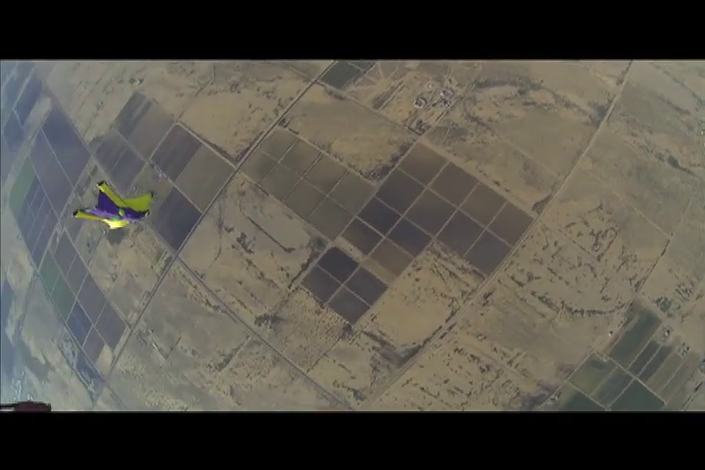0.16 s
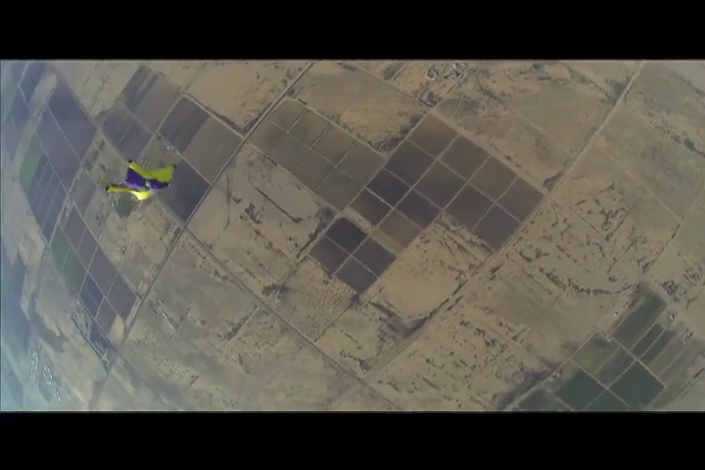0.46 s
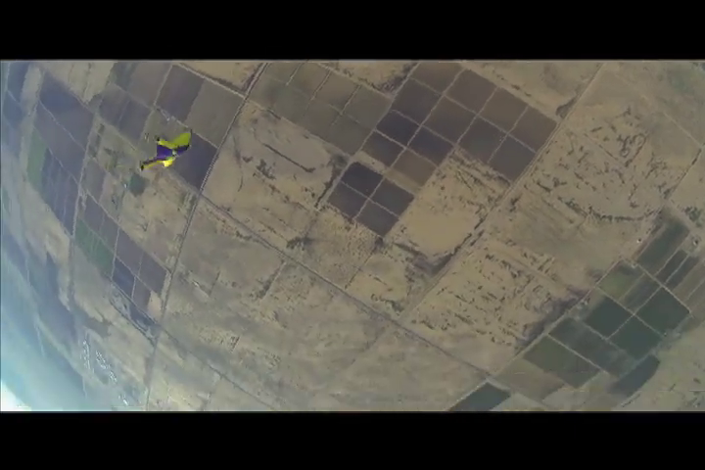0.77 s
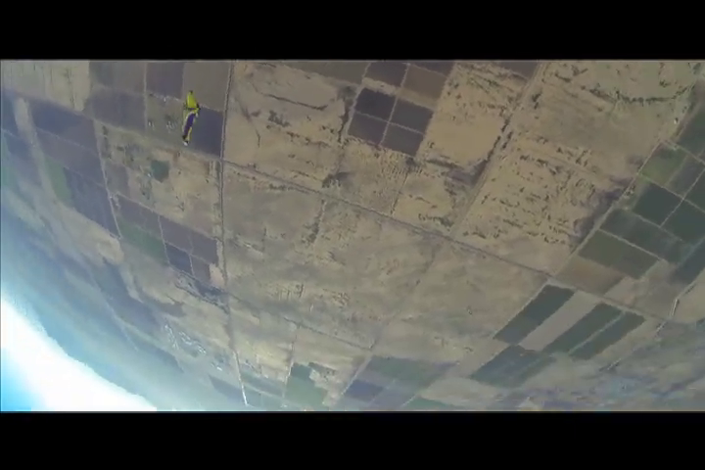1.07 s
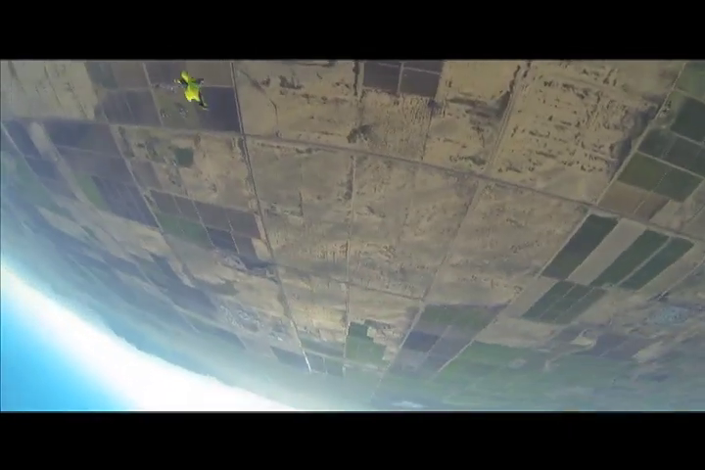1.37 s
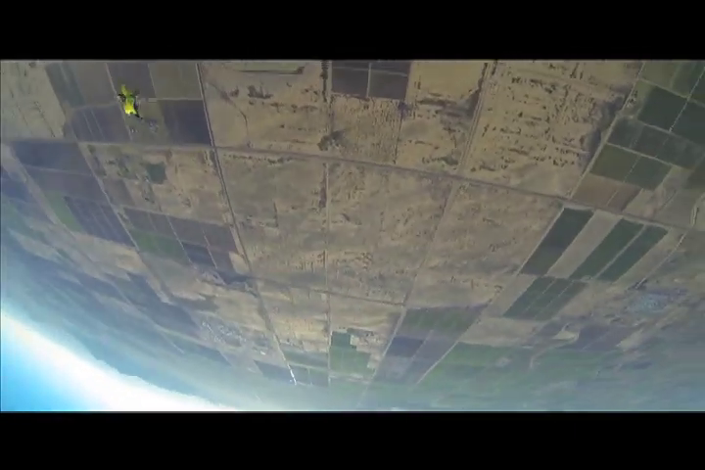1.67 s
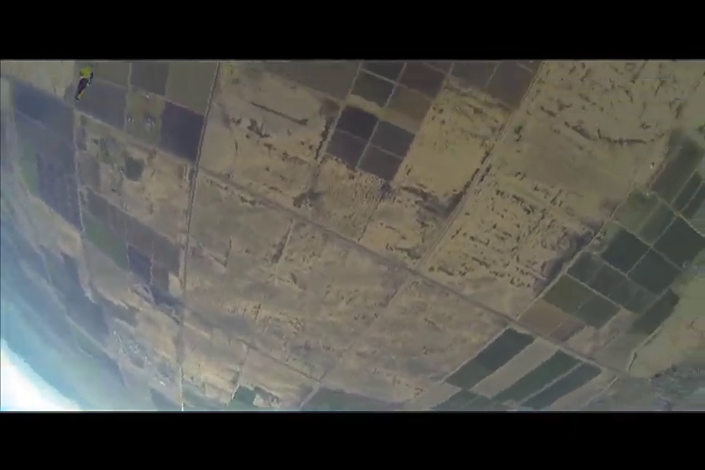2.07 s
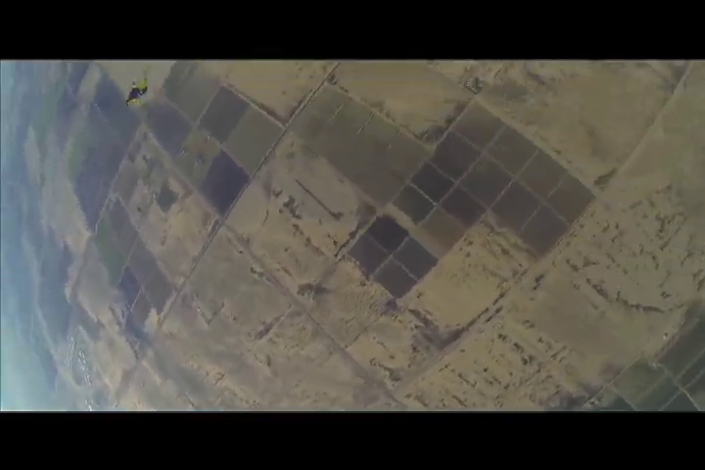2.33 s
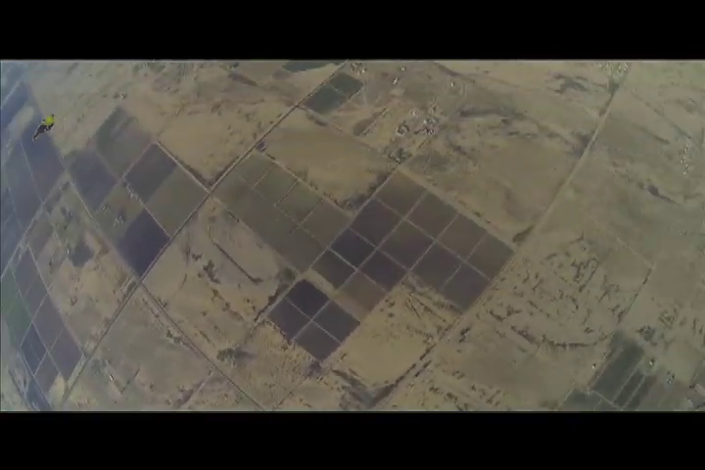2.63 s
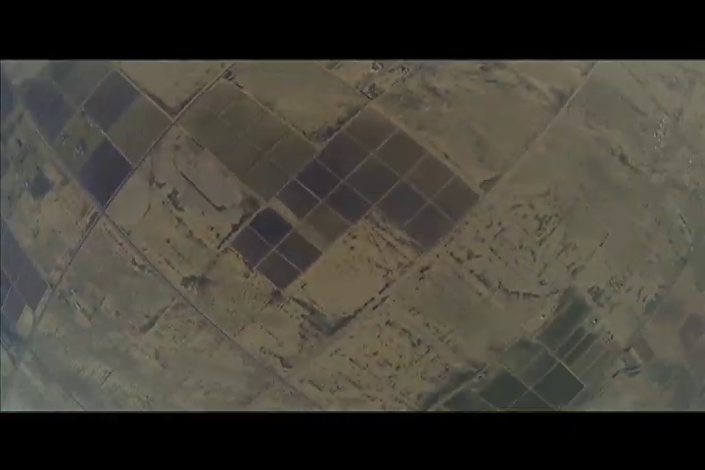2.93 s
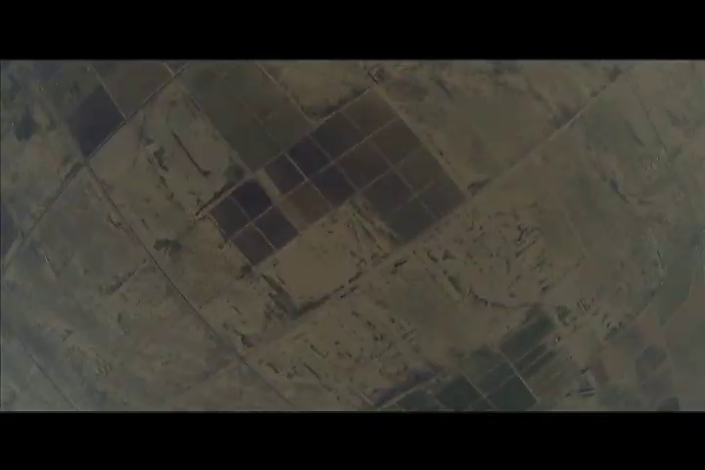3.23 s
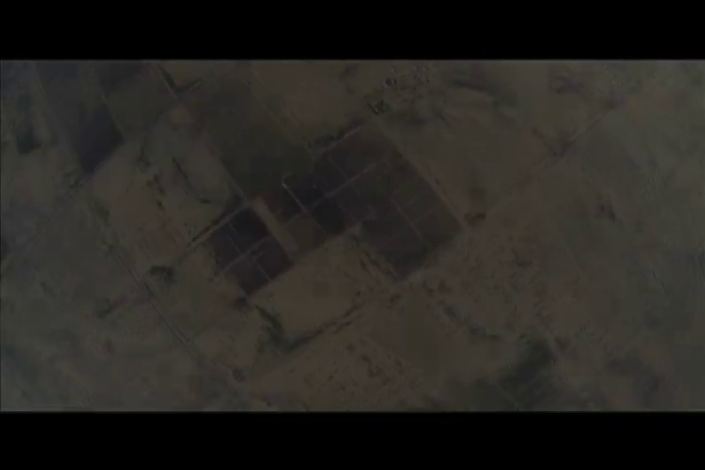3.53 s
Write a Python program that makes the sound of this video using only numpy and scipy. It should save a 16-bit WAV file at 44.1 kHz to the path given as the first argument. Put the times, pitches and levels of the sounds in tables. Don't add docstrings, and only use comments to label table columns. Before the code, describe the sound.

Violent freefall wind blasts a small camera microphone from the start, left channel only, the right silent. Harsh, hollow hiss and mid roar ride over lumpy bass rumble, fullest before 0.75 s. Irregular buffets thump and overload the input until about 2.6 s, strongest near 0.2 and 0.8, each briefly ducking the hiss. Fuzzy whistles pass near 0.7 and 2.1-2.4; rumble thins and wind fades by 3.7 s.

```python
import sys
import numpy as np
from scipy import signal
from scipy.fft import rfft, irfft
from scipy.io import wavfile
from scipy.ndimage import uniform_filter1d

SR = 44100
rng = np.random.default_rng(int(sys.argv[2]) if len(sys.argv) > 2 else 0)


def volts_from_decibels(level):
    exponent = np.asarray(level, float) / 20
    return 10 ** exponent


def file_out(sig):
    cols = np.atleast_2d(sig).T
    lim = np.clip(cols, -1, 1)
    pcm = np.round(lim * 32767).astype(np.int16)
    wavfile.write(sys.argv[1], SR, pcm)


N = 163170
TIME_S = np.arange(N) / SR
SPECTRUM_HZ = np.fft.rfftfreq(N, 1 / SR)

# time_s [s], hiss_db [dB], buffeting_db [dB], brightness_db [dB]
AIRFLOW = [(0, -16.5, -9.5, -5), (.04, -15, -11, -2.5), (.12, -10.5, -12, 0), (.25, -12, -11, -2),
           (.55, -12, -14, -2), (.74, -11.5, -13, 2.5), (.85, -15, -15.5, 1), (.94, -14, -15, 3),
           (1.05, -13, -13, -1), (1.19, -12.5, -13, 1), (1.3, -15, -14.5, -1), (1.48, -13.5, -12, 1),
           (2.03, -13.5, -15, 2.5), (2.2, -14.5, -17, 4), (2.45, -14.5, -20, 2), (2.66, -15, -19, -2),
           (3.08, -16, -25.5, 0.5), (3.7, -19, -25.5, 1.5)]
# time_s [s], gain_drop_db [dB], thump_db [dB], pitch_hz [Hz]
BIG_BUFFETS = [(0.038, 3.5, -6, 60), (0.173, 2, 5.5, 61.4), (.40, 2.5, -2.5, 70), (0.606, 3.5, 0, 60),
               (0.802, 3.5, 6, 50.5), (0.966, 3, 1.5, 59.7), (1.207, 4.5, -16, 70.4), (1.287, 4.5, -2, 70),
               (1.51, 4.5, -2, 59.7), (1.601, 3.5, -1, 60), (1.719, 3, 1.5, 60), (2.094, 4, 1.5, 68.6),
               (2.238, 3.5, -2, 70), (2.351, 3, -11, 70), (2.50, 2.5, -1, 70), (2.599, 3, -8, 70)]


def evened(x):
    return x / np.sqrt(np.mean(x ** 2) + 1e-20)


def read(points, hz):
    f, value = np.transpose(points)
    return np.interp(np.log(hz + 1), np.log(f + 1), value)


def filtered(x, gain):
    return irfft(rfft(x) * gain, N)


def wander(t, low_hz, high_hz):
    total = np.zeros(len(t))
    for f in np.geomspace(low_hz, high_hz, num=24):
        total += np.sin(2 * np.pi * (f * t + rng.random())) / np.sqrt(f)
    return evened(total)


def resonate(x, hz, width_hz):
    turn = np.exp(2j * np.pi * np.cumsum(hz * np.ones(len(x))) / SR)
    r = np.exp(-np.pi * width_hz / SR)
    return 2 * (turn * signal.lfilter([1 - r], [1, -r], x / turn)).real


def knocked_db(t):
    drop_s, recover_db_per_s = 0.0042, 38.5
    gain_db = np.zeros(len(t))
    for start_s, drop_db, _, _ in BIG_BUFFETS:
        onset = np.clip((t - start_s) / drop_s, 0, 1)
        gain_db -= onset * np.maximum(drop_db - recover_db_per_s * (t - start_s), 0)
    return gain_db


def whistles():
    # start_s [s], length_s [s], level_db [dB], pitch_hz [Hz], glide [share of pitch]
    port_notes = [
        (.63, .16, -17.5, 2800, .2),
        (2.12, 0.13, -16.5, 2850, -.03),
        (2.24, .13, -14, 2760, -.02),
        (2.374, .11, -23, 825, 0),
        (0, .3, -18, 1120, .05),
    ]
    out, air = np.zeros(N), rng.standard_normal(N)
    for start_s, length_s, level_db, pitch_hz, glide in port_notes:
        progress = np.clip((TIME_S - start_s) / length_s, 0, 1)
        gliding_hz = pitch_hz * (1 + glide * (progress - .5))
        width_hz = 600 * pitch_hz / 2800
        note = resonate(resonate(air, gliding_hz, width_hz), gliding_hz, width_hz)
        out += volts_from_decibels(level_db) * np.sin(np.pi * progress) * evened(note)
    return out


def roar():
    # frequency_hz [Hz], density_db [dB per Hz]
    turbulence = [(250, -23), (400, -4), (700, 1), (1000, 1.5), (1300, -2), (1800, -32.5)]
    base_db, follows, opening_db = -25, .8, 4
    time_s, _, buffeting_db, _ = np.transpose(AIRFLOW)
    noise = evened(filtered(rng.standard_normal(N), volts_from_decibels(read(turbulence, SPECTRUM_HZ))))
    opening = opening_db * np.clip((.75 - TIME_S) / .05, 0, 1)
    swell = follows * (np.interp(TIME_S, time_s, buffeting_db) - buffeting_db.mean())
    return noise * volts_from_decibels(base_db + opening + swell + 1.6 * wander(TIME_S, 2.49, 30))


def hiss():
    # frequency_hz [Hz], density_db [dB per Hz]
    shear = [(300, -13), (550, -12), (1000, -1.5), (2200, -1.5), (3500, -7.5), (6000, -15.5),
             (11500, -24.5), (15500, -44)]
    # pitch_hz [Hz], width_hz [Hz], boost_db [dB]
    resonances = [(695, 140, 8.5), (1342, 206, 13.5), (1509, 645, 15.5), (2800, 640, 7), (3320, 310, 7.5),
                  (4130, 180, 4.5), (5037, 910, 8), (6420, 230, 9), (7310, 590, 5.5), (8100, 400, 3.5),
                  (10900, 1000, -1), (13400, 1200, 8.5)]
    patchy_db, gust_db, trim_db = 0.75, 0.46, 6
    cavity_follows, treble_follows = 0.91, 1.07
    time_s, level_db, _, bright_db = np.transpose(AIRFLOW)

    frames, hz = N // 128 + 5, np.fft.rfftfreq(512, 1 / SR)
    t = np.arange(frames) * 128 / SR
    real, imaginary, patches = rng.standard_normal((frames, 257, 3)).T
    patches = uniform_filter1d(patches, size=10, axis=0)
    patches = evened(uniform_filter1d(patches, size=20, axis=1))
    follows = read([(1800, cavity_follows), (4000, treble_follows)], hz)[:, None]
    tilt = read([(1700, 0), (2600, 0.68), (12000, 0.83)], hz)[:, None]
    bright = tilt * np.interp(t, time_s, bright_db)
    motion = knocked_db(t) + gust_db * wander(t, 2.52, 14)
    gain = volts_from_decibels(patchy_db * patches + follows * motion + bright)
    noise = signal.istft((real + 1j * imaginary) * gain, nperseg=512, noverlap=384)[1][:N]

    ring = np.ones(len(SPECTRUM_HZ))
    for pitch_hz, width_hz, boost_db in resonances:
        distance = 2 * (SPECTRUM_HZ - pitch_hz) / width_hz
        ring += (volts_from_decibels(boost_db) - 1) / (1 + distance ** 2) ** 1.57
    rung = evened(filtered(noise, volts_from_decibels(read(shear, SPECTRUM_HZ)) * ring))
    return rung * volts_from_decibels(trim_db + np.interp(TIME_S, time_s, level_db))


def thumps():
    turns = 0.83
    out = np.zeros(N)
    for centre_s, _, thump_db, pitch_hz in BIG_BUFFETS:
        progress = np.clip((TIME_S - centre_s) * pitch_hz / turns + .5, 0, 1)
        swing = np.sin(2 * np.pi * pitch_hz * (centre_s - TIME_S))
        out += volts_from_decibels(thump_db) * np.sin(np.pi * progress) ** 2 * swing
    return out


def rumble():
    # frequency_hz [Hz], density_db [dB per Hz]
    eddies = [(8.8, -29), (15, -0.5), (76, 0), (177, -14.5), (241, -12.5), (290, -17.5), (476, -26.5),
              (600, -25.5), (780, -32), (1320, -120)]
    shedding_hz, shedding_width_hz, shedding_db = 76.3, 27, -7.5
    trim_db, lumpy_db = 7.0, 1.0
    time_s, _, buffeting_db, _ = np.transpose(AIRFLOW)
    shape_db = read(eddies, SPECTRUM_HZ) - 40 * (SPECTRUM_HZ > 700)
    push = evened(filtered(rng.standard_normal(N), volts_from_decibels(shape_db)))
    hum = resonate(rng.standard_normal(N), shedding_hz, shedding_width_hz)
    hum = resonate(hum, shedding_hz, shedding_width_hz)
    low = evened(push + volts_from_decibels(shedding_db) * evened(hum))
    level_db = np.interp(TIME_S, time_s, buffeting_db)
    return low * volts_from_decibels(trim_db + level_db + lumpy_db * wander(TIME_S, 2.567, 15))


def scene():
    low = (rumble() + roar()) * volts_from_decibels(knocked_db(TIME_S)) + thumps()
    left = low + hiss() + whistles()
    return np.array([left, np.zeros(N)])


def top_cut(x):
    return signal.sosfilt(signal.butter(12, 15700, fs=SR, output="sos"), x)


def record(dry):
    # frequency_hz [Hz], gain_db [dB]
    top_end = [(11000, 0), (13000, -2), (14500, -2.5), (15200, -5), (15700, -10)]
    input_db, ceiling = -.45, 0.996
    loud = np.clip(volts_from_decibels(input_db) * dry, -ceiling, ceiling)
    rolled = filtered(loud, volts_from_decibels(read(top_end, SPECTRUM_HZ)))
    return top_cut(rolled)


dry = scene()
out = record(dry)
file_out(out)
```